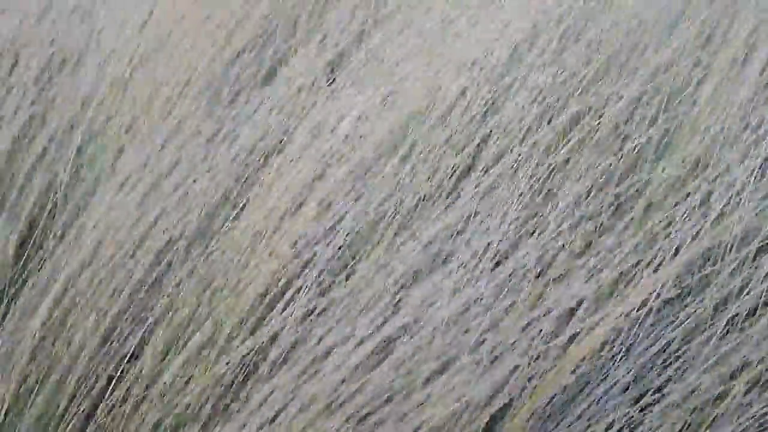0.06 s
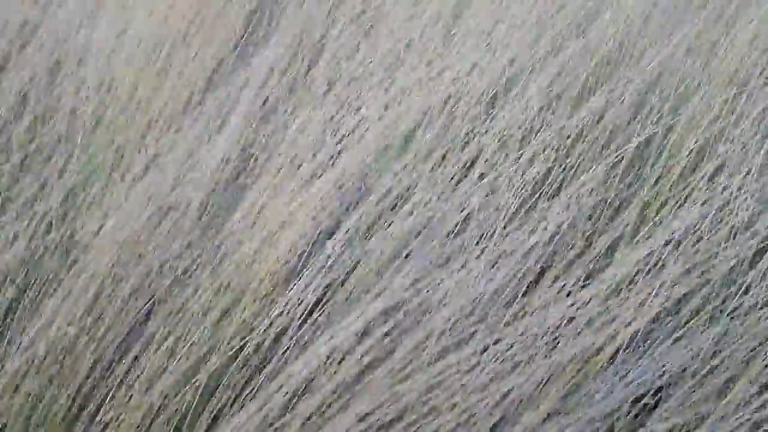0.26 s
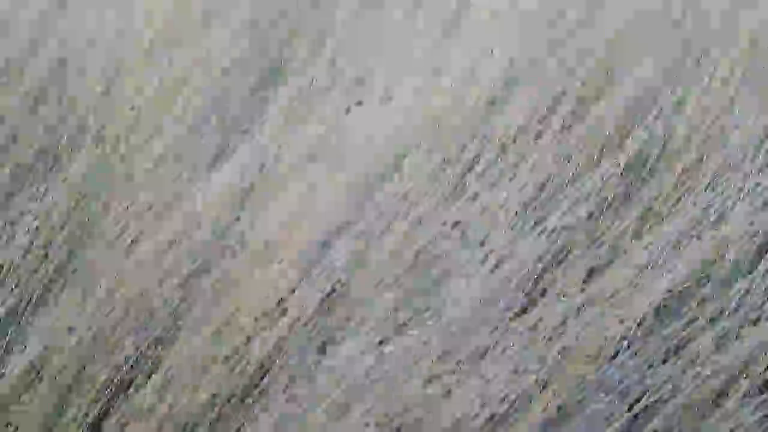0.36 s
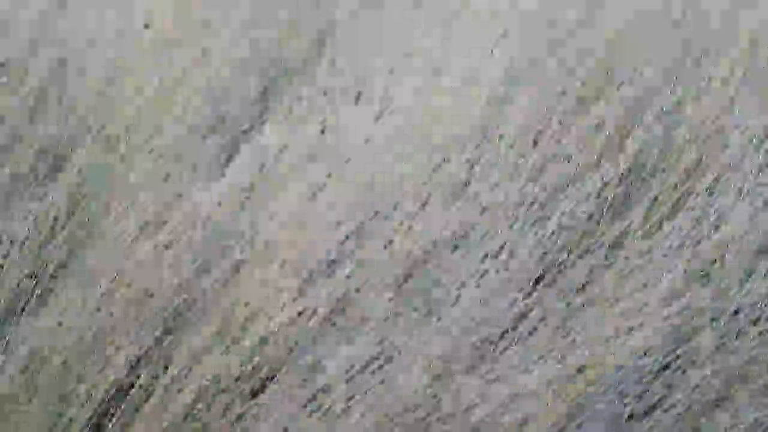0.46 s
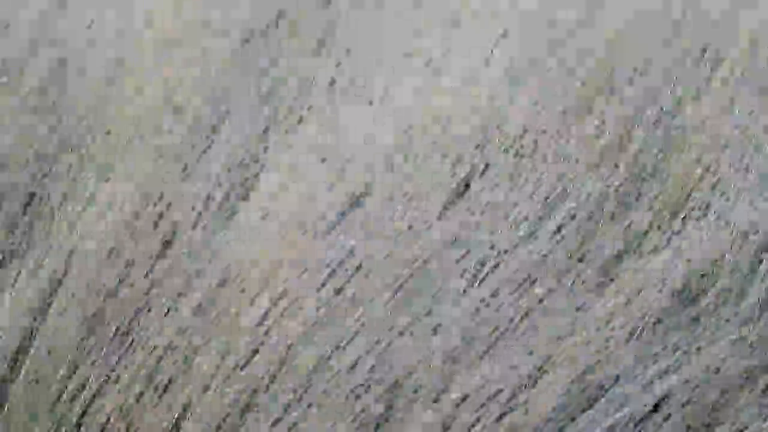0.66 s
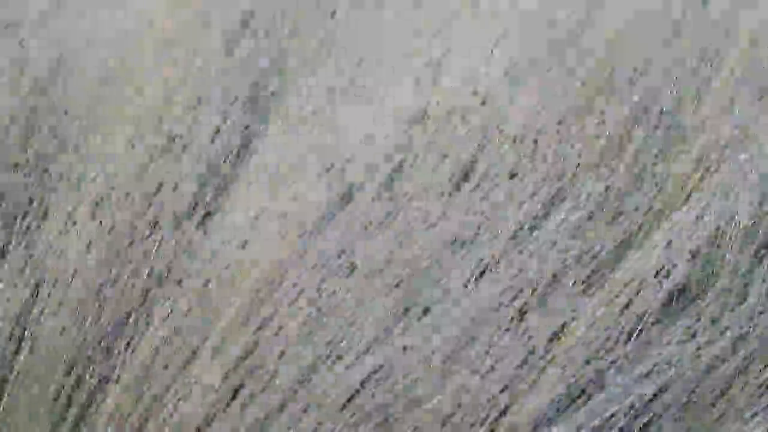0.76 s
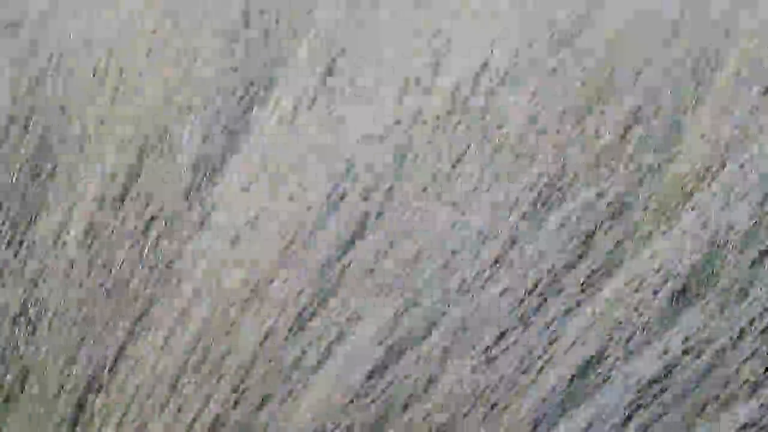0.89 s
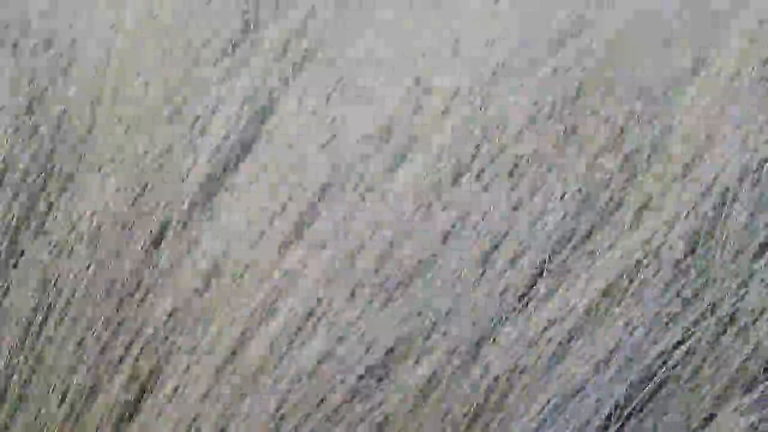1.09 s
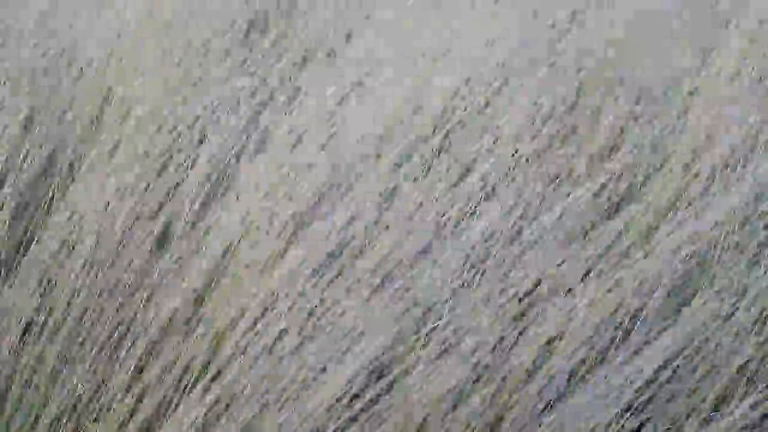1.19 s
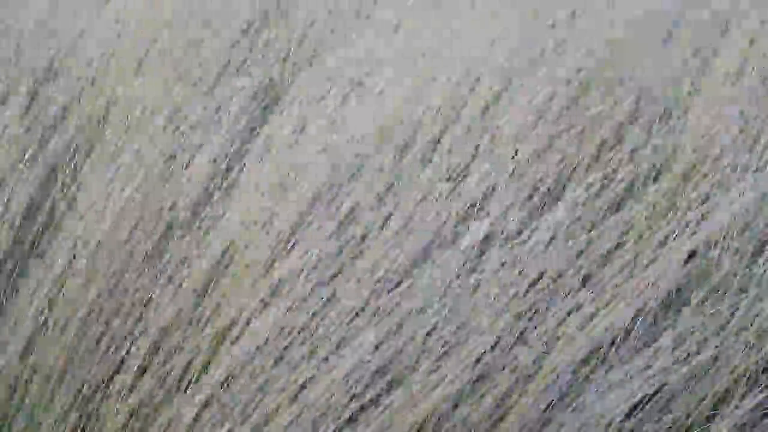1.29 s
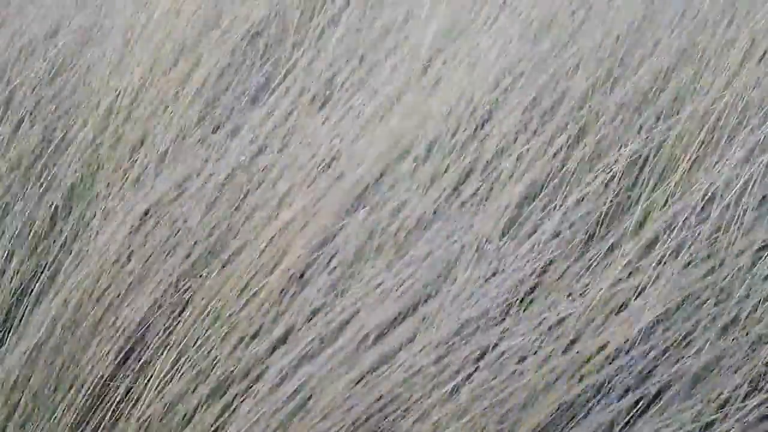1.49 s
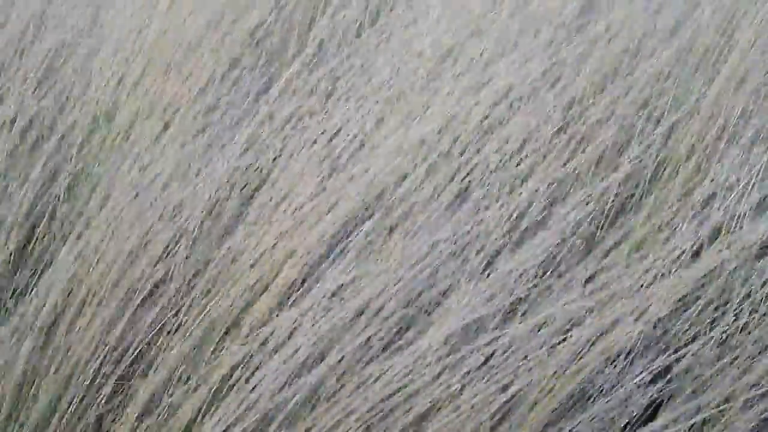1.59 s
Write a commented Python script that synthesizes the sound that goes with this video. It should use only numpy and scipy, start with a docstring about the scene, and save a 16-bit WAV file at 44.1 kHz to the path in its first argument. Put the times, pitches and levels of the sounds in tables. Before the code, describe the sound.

Wind buffets the microphone outdoors in long grass. A dull flutter swells into a rough, tearing rumble with hollow thumps, sharp spits of air and a few small ticks, then eases, while the grass hisses faintly behind.

```python
"""A dull flutter of wind on a small stereo microphone, opening into a rough, tearing rumble.
The faster the air, the brighter it sounds. Large eddies (swirls of air) land as hollow thumps,
and the fastest air spits as it tears off the microphone's openings, called ports.
Behind it long grass hisses faintly, and a few small ticks come with the strongest gusts."""
import sys
import numpy as np
from scipy import signal
from scipy.fft import rfft, irfft
from scipy.io import wavfile
from scipy.ndimage import minimum_filter1d

SR = 44100
rng = np.random.default_rng(int(sys.argv[2]) if len(sys.argv) > 2 else 0)


def file_out(sig):
    """Save sig as 16-bit WAV at sys.argv[1]."""
    # one column per channel
    cols = np.atleast_2d(sig).T
    # limit, then scale
    lim = np.clip(cols, -1, 1)
    pcm = np.round(lim * 32767).astype(np.int16)
    wavfile.write(sys.argv[1], SR, pcm)


N = 72765
TIME, HZ = np.arange(N) / SR, np.fft.rfftfreq(N, 1 / SR)


def amp(db):
    """Turns decibels into a gain to multiply by."""
    return 10 ** (np.asarray(db) / 20)

def normalise(x):
    """Scales to an average strength (rms) of 1."""
    return x / np.sqrt(np.mean(x ** 2) + 1e-20)

def colour(points):
    """Gain at every frequency, from (Hz, dB) points."""
    hz, db = np.transpose(points)
    return amp(np.interp(np.log(HZ + 1), np.log(hz + 1), db))

def follow(table):
    """Joins timed rows with straight lines, one curve per value column."""
    times, *columns = np.transpose(table)
    return [np.interp(TIME, times, column) for column in columns]

def smooth(x, rate_hz):
    """Fades out motion faster than a rate."""
    return irfft(rfft(x) * np.exp(-.5 * (HZ / rate_hz) ** 2), N)

def wander(rate_hz):
    """Random drift up to about a rate, with strength 1."""
    return normalise(smooth(rng.standard_normal(N), rate_hz))

def swell(centre, length):
    """A brief rise and fall, half as high at the ends of its length."""
    return .5 ** ((2 * (TIME - centre) / length) ** 2)

def stereo(pair, tone, width):
    """Colours two noises: mid is what both ears share, side is how they differ."""
    mid, side = rfft(pair) * colour(tone)
    side = side * colour(width)
    return irfft(np.array([mid + side, mid - side]), N)


# Tone of the grass. Each row: frequency in Hz, relative level in dB.
GRASS_COLOUR = [(25, -25), (60, -2.5), (250, 3), (600, 1), (1300, -2), (2000, -7), (3200, -16),
                (5000, -24.5), (7500, -32), (12300, -36.5), (13200, -47), (15000, -42)]
# Stereo width of the grass. Each row: frequency in Hz, side minus mid in dB.
GRASS_WIDTH = [(100, -43), (1200, -32), (2200, -14.5), (4000, -4), (8000, 2.5), (12000, 4.5), (14000, 3)]
# Rise and fall of the hiss. Each row: time in seconds, level in dB.
GRASS_LOUDNESS = [(0, -46), (.3, -43.5), (.6, -42), (.72, -44), (.82, -47.5), (1.05, -47), (1.2, -51.5),
                  (1.33, -48), (1.48, -46), (1.65, -45)]

def grass(shimmer_db=0.92, shimmer_hz=40):
    """Countless blades brush together and merge into a soft, shimmering hiss."""
    hiss = normalise(stereo(rng.standard_normal((2, N)), GRASS_COLOUR, GRASS_WIDTH))
    level_db, = follow(GRASS_LOUDNESS)
    return hiss * amp(level_db + shimmer_db * wander(shimmer_hz))


# Tone shared by all ticks. Each row: frequency in Hz, relative level in dB.
TICK_TONE = [(200, -32.5), (1500, -1.5), (10000, -10), (14000, -9.5)]
# Small ticks. Each row: start in seconds, level in dB, length in seconds,
# cutoff in Hz (the sound fades above it).
TICK_BURSTS = [(.839, -47.5, .0005, 10900), (0.87, -38, 0.0033, 2300), (0.904, -47.5, .0006, 6500),
               (.967, -59, .0006, 7000), (0.9749, -28, 0.0011, 3200), (.999, -61.5, .0005, 8000),
               (1.056, -24.5, .005, 3650), (1.063, -37.5, 0.0088, 3300), (1.085, -45, 0.00047, 7400),
               (1.101, -56, 0.0004, 7960), (1.1165, -46, 0.00037, 7000), (1.369, -47.5, 0.0004, 8000)]

def ticks(steepness=7.3):
    """Short dry crackles of noise: the long ones rasp, the fine ones are bright."""
    out = np.zeros((2, N))
    for start, level_db, length, cutoff_hz in TICK_BURSTS:
        age = np.maximum(TIME - start, 0) / length
        envelope = amp(level_db) * 2 * age * np.exp(-age ** 2)
        burst = envelope * rng.standard_normal((2, N))
        tone = normalise(colour(TICK_TONE) / np.sqrt(1 + (HZ / cutoff_hz) ** steepness))
        out += irfft(rfft(burst) * tone, N)
    return out


# How the two ports differ, in spits and buffeting. Each row: frequency in Hz, side minus mid in dB.
PORT_WIDTH = [(60, -43.5), (140, -51), (210, -36.5), (320, -24), (490, -19.5), (740, -14), (1130, -10.5),
              (1710, -6.5), (2600, -2), (6000, 5)]
# Tone of tearing air. Each row: frequency in Hz, relative level in dB.
SPIT_TONE = [(300, -41), (900, -3.5), (1700, 6.5), (2500, -4), (3000, -16.5), (3600, -26.5), (5000, -38),
             (12000, -65)]
# Spits of air. Each row: time of the peak in seconds, level in dB, length in seconds.
AIR_SPITS = [(0.603, -16.5, 0.003), (0.6168, -20, 0.0052), (.653, -38, 0.001), (0.709, -24, 0.0038),
             (0.717, -17, 0.0019), (.761, -7, 0.001), (0.771, -24.5, 0.0057), (0.776, -19.5, 0.0054),
             (0.782, -16.5, 0.0023), (0.831, -36, 0.0019), (0.85, -34.5, 0.0034), (0.868, -19, 0.002),
             (0.8767, -16, 0.0012), (0.908, -25.5, 0.0036), (0.9085, -24, 0.0042), (0.934, -26.5, 0.0014),
             (0.9381, -23, 0.0034), (0.97, -32.5, 0.0019), (0.983, -25, 0.0019), (1.013, -33.5, 0.0015),
             (1.034, -28, 0.0027), (1.039, -28, 0.0016), (1.0534, -23.5, 0.0027), (1.143, -40, 0.0021)]

def spits(steady_hz=120):
    """Fast air tears off the port edges in sharp, separate spits."""
    envelope = sum(amp(level_db) * swell(centre, length) for centre, level_db, length in AIR_SPITS)
    tearing = stereo(rng.standard_normal((2, N)), SPIT_TONE, PORT_WIDTH)
    power = smooth((tearing ** 2).mean(0), steady_hz)
    return envelope * tearing / np.sqrt(abs(power) + 1e-12)  # evens out the noise's own swells


# Hollow thumps. Each row: time of the peak in seconds, level in dB, pitch in Hz, length in seconds.
EDDY_THUMPS = [(.215, -16, 370, 0.0052), (0.3077, -16, 401, 0.0049), (0.318, -17, 364, 0.0043),
               (.344, -18.5, 394, 0.0045), (.463, -15, 355, 0.0064), (0.478, -17, 433, 0.0085),
               (0.4946, -14.5, 330, 0.0067), (.507, -10.5, 379, 0.016), (.53, -22, 150, 0.025),
               (0.546, -19.5, 384, 0.0061), (.5776, -29, 403, 0.0032), (0.588, -30.5, 146, 0.031),
               (0.5943, -12, 760, 0.0028), (0.602, -14.5, 202, 0.0081), (.607, -12.5, 379, 0.0017),
               (.693, -10, 451, 0.0026), (.694, -16, 793, 0.0038), (0.7087, -6.5, 780, 0.0023),
               (0.7092, -14, 393, 0.018), (0.72, -14, 813, 0.0077), (0.7316, -23, 384, 0.0046),
               (0.7597, -1.5, 1083, 0.0037), (0.776, -8.5, 700, 0.0058), (0.86, -12.5, 423, 0.0066),
               (0.883, -9, 850, 0.0016), (0.916, -15, 407, 0.011), (0.979, -27, 80, 0.015),
               (.986, -16, 412, 0.0045), (1.034, -10.5, 392, 0.0058), (1.0583, -10.5, 426, 0.0054),
               (1.0661, -13.5, 374, 0.0073), (1.097, -16.5, 1005, 0.0088), (1.1048, -23, 404, 0.004),
               (1.2256, -16.5, 375, 0.0039), (1.361, -21.5, 383, 0.012), (1.3725, -16.5, 771, 0.014),
               (1.529, -22, 407, 0.0048)]

def thumps(spread_hz=2200):
    """Large eddies hit the ports, which ring briefly; higher rings differ more from left to right."""
    out = np.zeros((2, N))
    left_right = np.array([[1], [-1]])
    for centre, level_db, hz, length in EDDY_THUMPS:
        shared, skew = rng.uniform(-1.125, 1, 2)
        phase = np.pi * (shared + left_right * skew * (hz / spread_hz) ** 2)
        ring = np.sin(2 * np.pi * hz * (TIME - centre) + phase)
        out += amp(level_db) * swell(centre, length) * ring
    return out


def eddies(cutoff_hz, bands=30, hollow_db=3, hollow_hz=22):
    """Swirling air under a moving cutoff; each band swells by itself, giving passing hollow tones."""
    spectrum = rfft(rng.standard_normal((2, N)))
    centres_hz = np.geomspace(50, 10000, bands)
    out = np.zeros((2, N))
    for centre_hz, this_band in zip(centres_hz, np.eye(bands)):
        band_shape = np.interp(np.log(HZ + 1), np.log(centres_hz), this_band)
        band = irfft(spectrum * band_shape, N) * amp(hollow_db * wander(hollow_hz))
        ratio = centre_hz / cutoff_hz
        treble_cut = 1 + ratio ** 6.79  # eddies die out above the cutoff
        steep_cut = 1 + (ratio / 2.3) ** 8  # and faster still further up
        bass_cut = 1 + (0.12 / ratio) ** 2  # fast air makes few large eddies
        out += band / np.sqrt(treble_cut * steep_cut * bass_cut)
    return out


# Tone the ports give the wind. Each row: frequency in Hz, gain in dB.
PORT_COLOUR = [(20, -34.5), (40, -13.5), (70, -14.5), (120, -3.5), (230, 1.5), (330, 2), (450, 1),
               (560, -1.5), (760, -1.5), (1200, 0), (2200, -2), (3500, 2.5), (7000, 3.5), (14000, -8.5)]
# Gusts. Each row: time in seconds, relative level in dB, cutoff in Hz (higher in faster air).
AIR_FLOW = [(0, -45, 289), (.014, -52.5, 330), (.025, -32.5, 340), (.052, -33.5, 360), (.09, -49, 303),
            (.195, -65.5, 290), (.21, -25.5, 372), (.23, -30.5, 440), (.25, -24.5, 387), (.266, -43, 335),
            (.278, -26, 420), (.312, -26.5, 393), (.33, -37, 400), (.345, -27, 450), (.375, -31.5, 433),
            (.4, -40.5, 421), (.42, -48, 380), (.45, -37.5, 390), (.462, -31.5, 400), (.473, -23.5, 430),
            (.481, -36, 513), (.488, -30.5, 435), (.497, -15.5, 421), (.51, -22, 509), (.525, -20.5, 722),
            (.545, -20.5, 750), (.565, -24, 560), (.58, -21.5, 652), (.588, -23, 665), (.595, -23.5, 902),
            (.607, -16.5, 1070), (.62, -23.5, 1130), (.635, -28, 934), (.654, -25, 870), (.662, -39, 518),
            (.675, -36.5, 452), (.685, -26.5, 556), (.692, -22.5, 792), (.7, -27.5, 956),
            (.718, -18.5, 1074), (.738, -22.5, 1000), (.751, -24, 1100), (.76, -18.5, 1524),
            (.778, -22, 1680), (.802, -27.5, 1636), (.812, -28, 1400), (.822, -36.5, 1180),
            (.832, -26, 1330), (.842, -28.5, 1090), (.855, -24, 1260), (.863, -25, 1100),
            (.872, -19.5, 1400), (.888, -30.5, 1050), (.907, -22, 1220), (.925, -33.5, 1220),
            (.94, -19, 1253), (.965, -29, 1000), (.983, -28, 1087), (.998, -38.5, 763),
            (1.013, -28.5, 1100), (1.023, -29, 757), (1.035, -23, 934), (1.047, -30, 1015),
            (1.068, -20, 1278), (1.084, -29, 850), (1.098, -20.5, 918), (1.118, -36.5, 704),
            (1.142, -32, 840), (1.16, -38, 369), (1.215, -33.5, 453), (1.226, -29.5, 462),
            (1.242, -36.5, 415), (1.249, -27, 560), (1.268, -34, 508), (1.283, -27, 904),
            (1.305, -24.5, 758), (1.335, -42.5, 620), (1.36, -24.5, 690), (1.372, -25, 848),
            (1.388, -26.5, 761), (1.402, -34, 554), (1.44, -37.5, 680), (1.468, -42, 323),
            (1.518, -38, 430), (1.53, -33, 420), (1.542, -40.5, 330), (1.65, -46, 400)]

def buffeting(boost_db=3.5, flutter_hz=175, flutter_db=2, flutter_octaves=0.06, steady_hz=30.5):
    """Gusts beat on the ports: faster air is brighter and stronger."""
    level_db, cutoff_hz = follow(AIR_FLOW)
    flutter = wander(flutter_hz)  # single eddies shake both the cutoff and the level
    pressure = eddies(cutoff_hz * 2 ** (flutter_octaves * flutter)) * amp(flutter_db * flutter)
    power = smooth(pressure ** 2, steady_hz)
    steady = pressure / np.sqrt(abs(power) + 1e-12)  # leaves slow swells to the gusts alone
    gust_gain = np.sqrt(cutoff_hz / cutoff_hz.mean()) * amp(boost_db + level_db)
    return stereo(steady * gust_gain, PORT_COLOUR, PORT_WIDTH)


def scene():
    """Buffeting with its thumps and spits in front, grass and ticks behind."""
    return buffeting() + thumps() + spits() + grass() + ticks()

def record(dry, ceiling_db=-2.5, hold_s=.005, speed_hz=130, top_hz=15000):
    """A quick limiter turns down the loudest peaks, then a filter removes the highest treble."""
    safe_gain = np.minimum(amp(ceiling_db) / (abs(dry).max(0) + 1e-9), 1)
    held_gain = minimum_filter1d(safe_gain, int(hold_s * SR) + 1)
    limited = dry * smooth(held_gain, speed_hz)
    lowpass = signal.firwin(511, top_hz, window=("kaiser", 9), fs=SR)
    return signal.oaconvolve(limited, lowpass[None], "same")


dry = scene()
out = record(dry)
file_out(out)
```